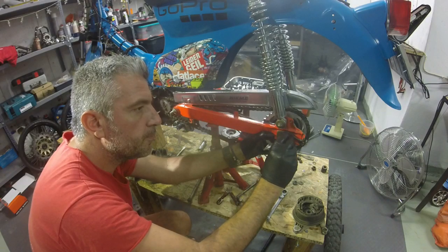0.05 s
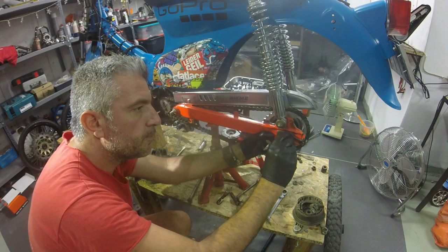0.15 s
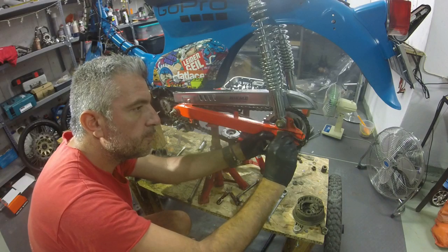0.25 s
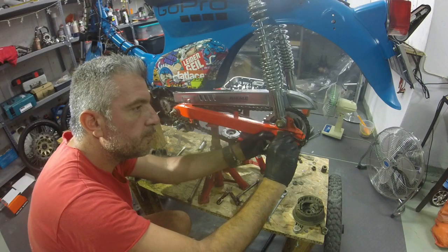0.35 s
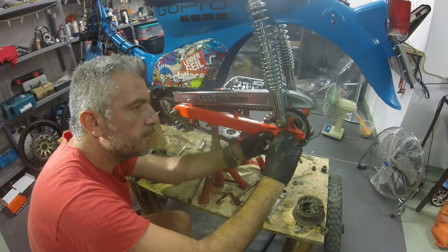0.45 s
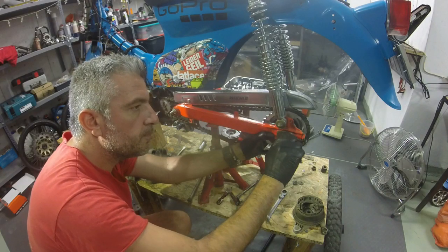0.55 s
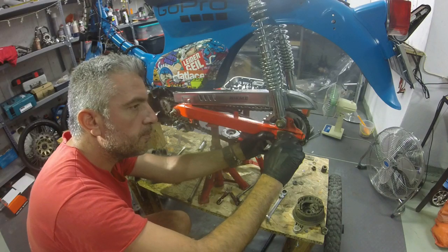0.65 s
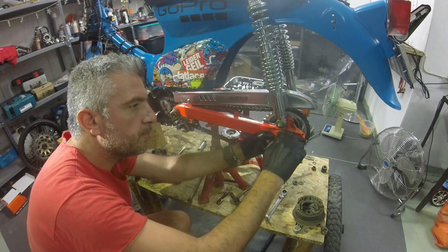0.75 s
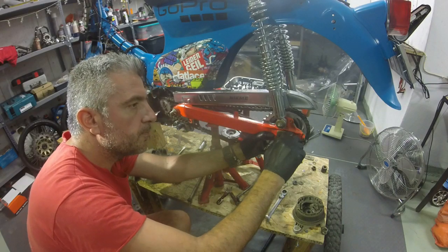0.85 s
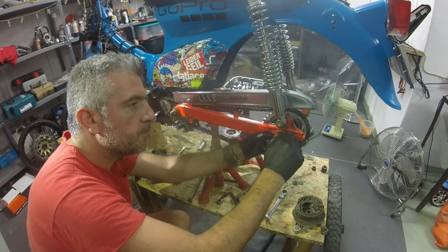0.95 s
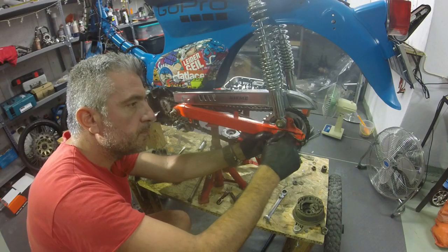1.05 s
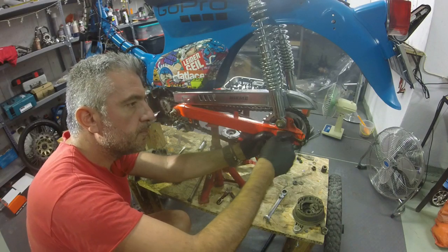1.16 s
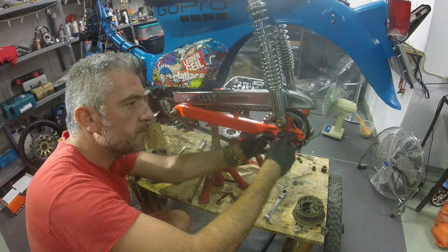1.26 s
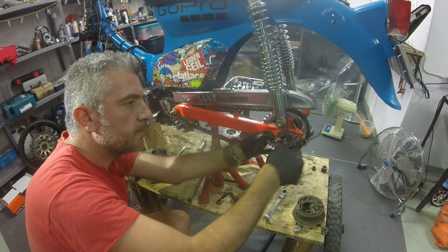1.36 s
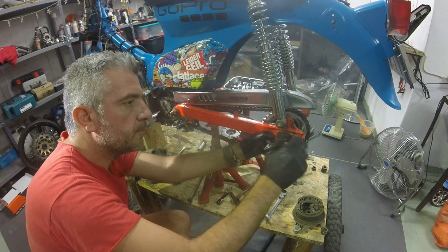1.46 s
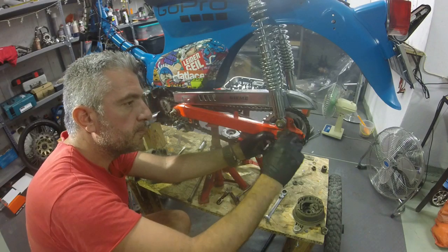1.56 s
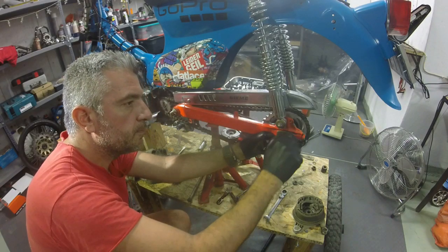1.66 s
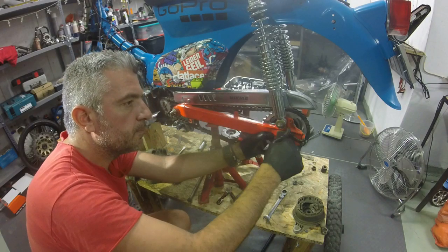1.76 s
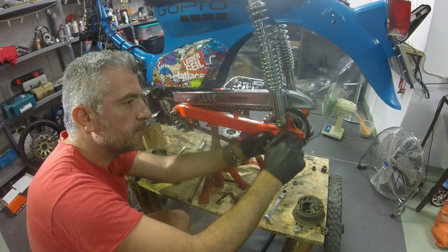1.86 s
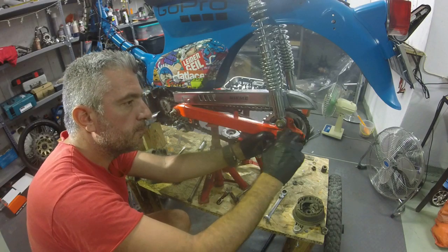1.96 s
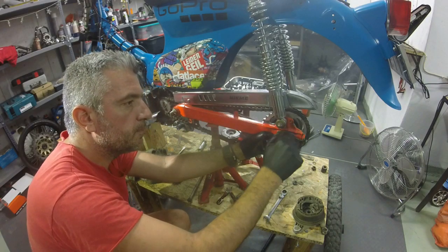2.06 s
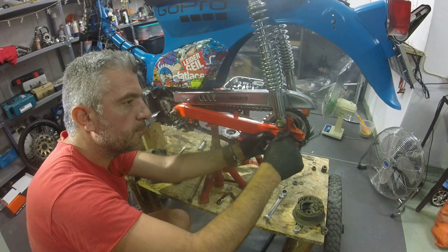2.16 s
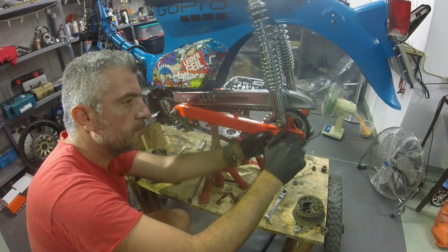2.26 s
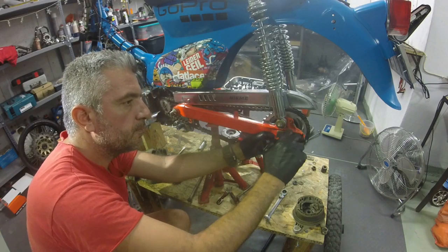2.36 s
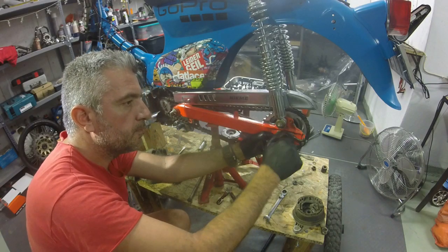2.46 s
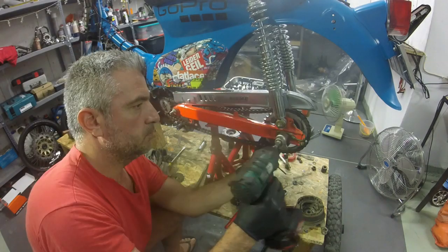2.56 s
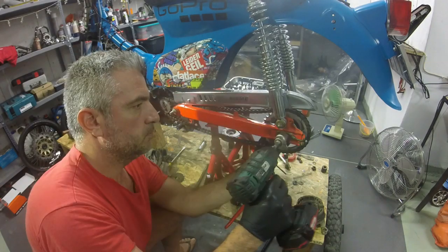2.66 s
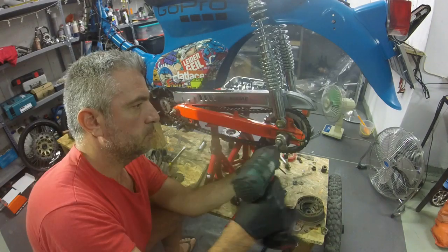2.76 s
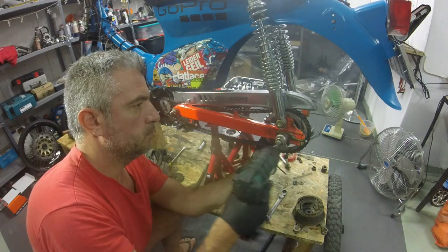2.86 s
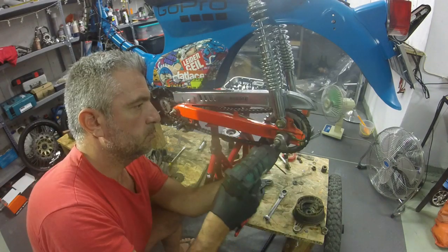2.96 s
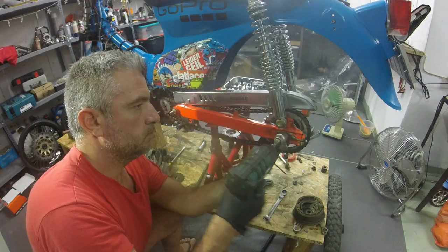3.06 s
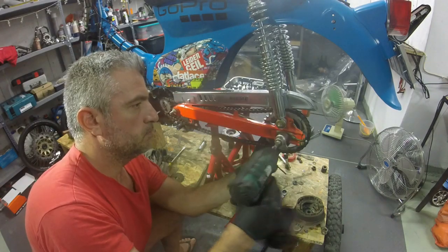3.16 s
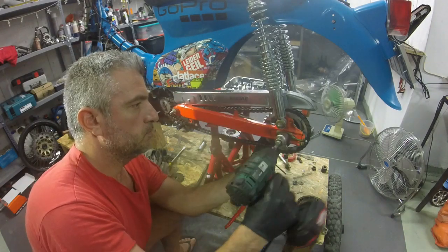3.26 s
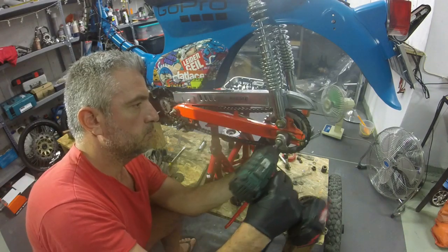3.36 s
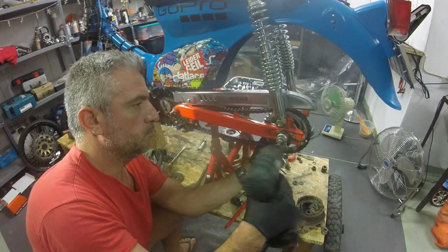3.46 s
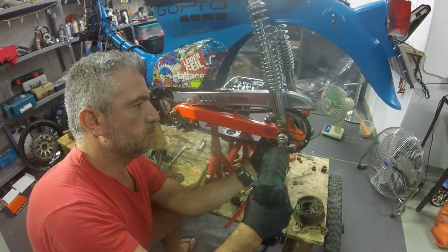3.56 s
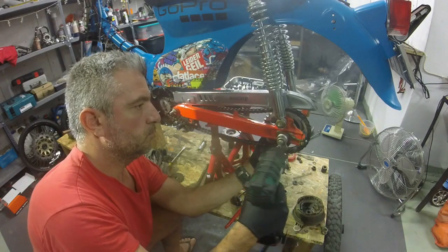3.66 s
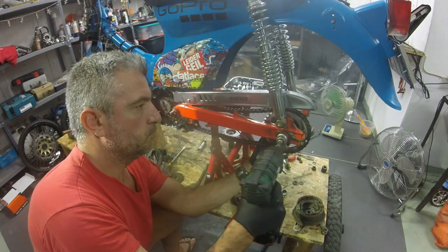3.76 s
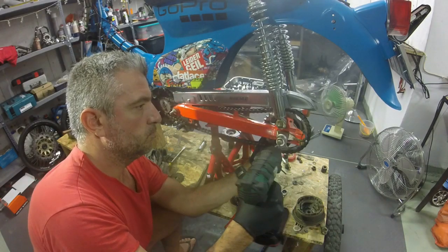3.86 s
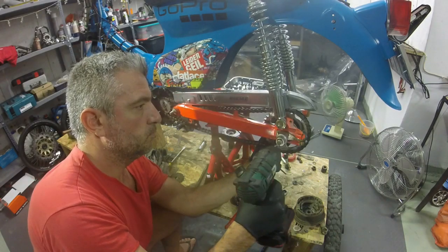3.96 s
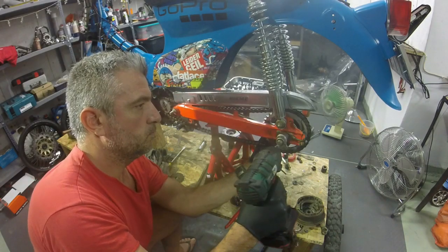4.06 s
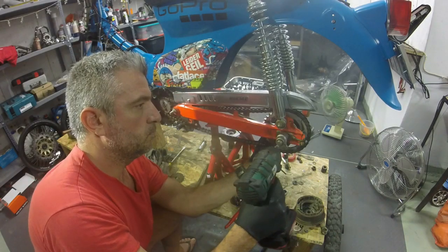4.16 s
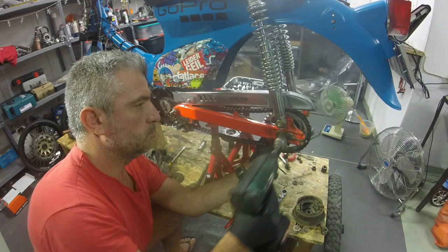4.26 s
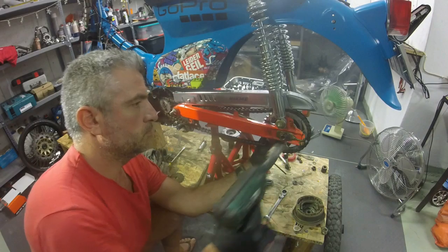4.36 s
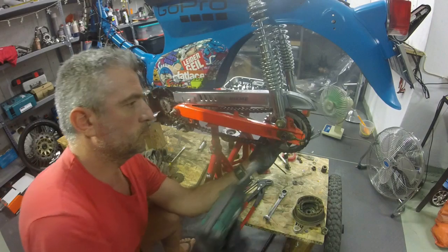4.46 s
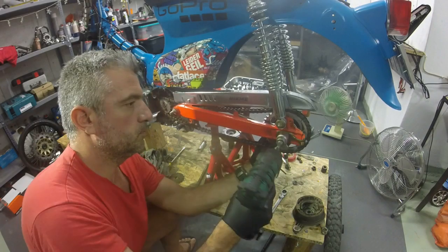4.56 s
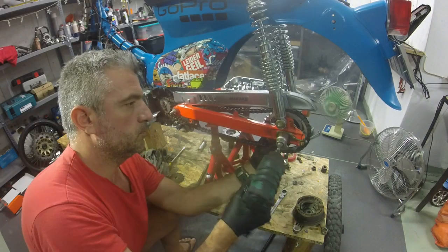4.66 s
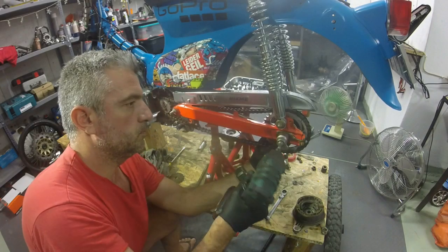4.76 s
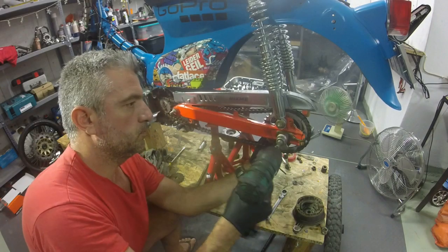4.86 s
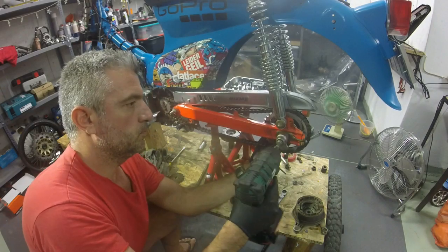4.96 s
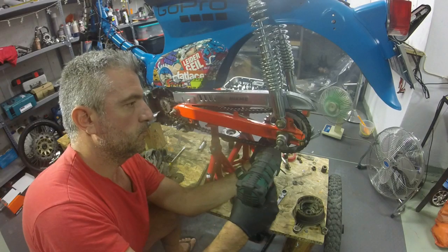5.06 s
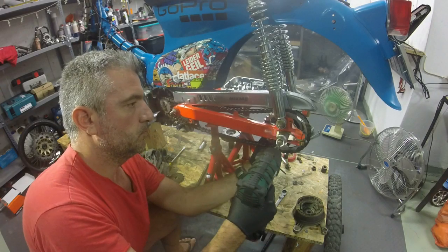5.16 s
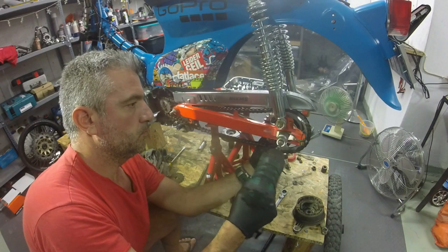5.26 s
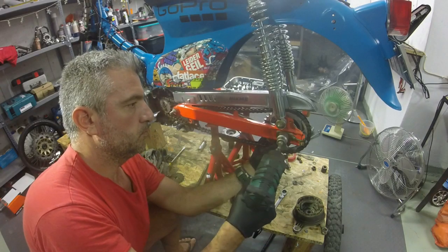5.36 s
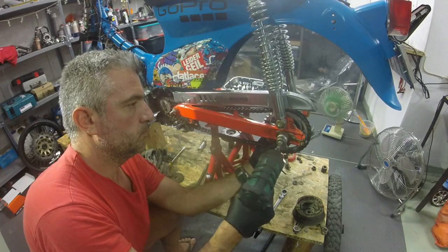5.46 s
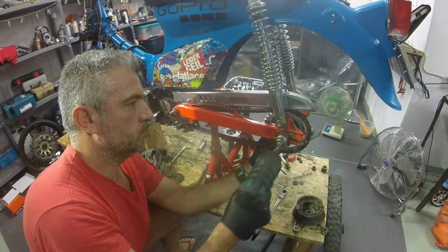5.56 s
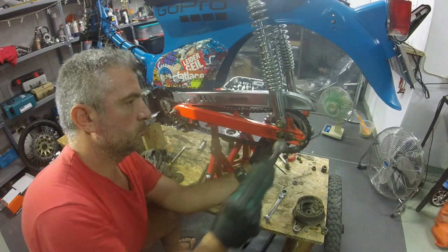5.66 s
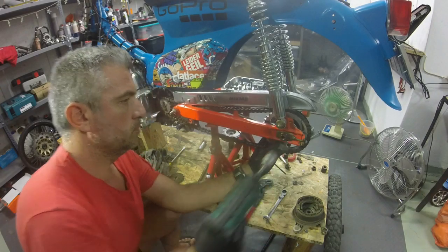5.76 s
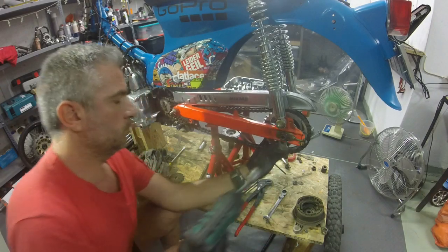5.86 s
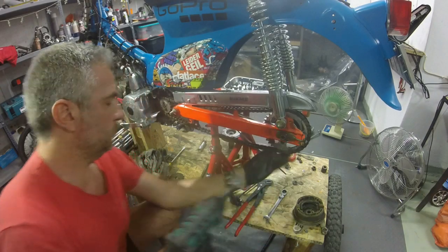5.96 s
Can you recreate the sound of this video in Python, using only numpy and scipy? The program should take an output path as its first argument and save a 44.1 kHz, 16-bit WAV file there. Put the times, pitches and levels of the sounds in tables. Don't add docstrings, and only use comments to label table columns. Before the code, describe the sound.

In a concrete-floored garage, fingers and spanner tick on a nut before an impact wrench hammers twice, rattling a steel frame over distant fan noise.

```python
import sys
import numpy as np
from scipy import signal
from scipy.fft import rfft, irfft
from scipy.io import wavfile
from scipy.ndimage import uniform_filter1d

SR = 44100
rng = np.random.default_rng(int(sys.argv[2]) if len(sys.argv) > 2 else 0)


def gain_from_decibels(decibels):
    exponent = np.asarray(decibels, float) / 20
    return 10 ** exponent


def to_wav(s):
    ch = np.atleast_2d(s).T
    pcm = np.round(np.clip(ch, -1, 1) * 32767)
    wavfile.write(sys.argv[1], SR, pcm.astype(np.int16))


N = 265482

# hz, level_db (per Hz)
RATTLE_SPECTRUM = [(59, -34.5), (100, -40), (570, -64), (648, 6), (801, 0), (1800, 5), (2990, 2), (3940, 5.5),
                   (12900, -10.5), (16000, -21)]


def rms_one(x):
    return x / np.sqrt(np.mean(x ** 2) + 1e-20)


def at_hz(points, hz):
    table_hz, value = np.transpose(points)
    return np.interp(np.log(np.maximum(hz, 1)), np.log(table_hz), value)


def in_time(points):
    s, db = np.transpose(points)
    return np.interp(np.arange(N) / SR, s, db, right=-200, left=-200)


def band(x, low_hz, high_hz):
    sos = signal.butter(2, [low_hz, min(high_hz, .45 * SR)], "band", fs=SR, output="sos")
    return signal.sosfilt(sos, x)


def coloured(spectrum):
    hz = np.fft.rfftfreq(N, 1 / SR)
    return rms_one(irfft(rfft(rng.standard_normal(N)) * gain_from_decibels(at_hz(spectrum, hz)), N))


def ring(drive, hz, t60_s):
    r, w = gain_from_decibels(-60 / (t60_s * SR)), 2 * np.pi * hz / SR
    return signal.lfilter([0, np.sin(w)], [1, -2 * r * np.cos(w), r * r], drive)


def resonance(x, hz, width_hz):
    r = np.exp(-np.pi * max(width_hz, hz / 8) / SR)
    poles = [1, -2 * r * np.cos(2 * np.pi * hz / SR), r * r]
    return signal.lfilter([(1 - r * r) / 2, 0, (r * r - 1) / 2], poles, x)


def contacts(rows, tone_db):
    s, peak_db, soft, bite, t60_s = np.transpose(rows)
    thud, body, edge = tone_db
    return np.transpose([s, peak_db, thud + soft, body + 0.75 * soft, edge + bite, t60_s])


def strike(events, peaks, lag_s, edge_pace, thud_hz):
    start_s, peak_db, thud_db, body_db, edge_db, t60_s = np.transpose(events)
    age = np.arange(SR // 3) / SR
    fall_db = -60 * age / t60_s[:, None]

    grains = rng.standard_normal(fall_db.shape) * gain_from_decibels(1.1 * rng.exponential(1, fall_db.shape))
    crack = 1 + gain_from_decibels(-0.5 - 60 * age / .009)
    chatter = grains * crack * (1 - np.exp(-age / 0.00021))
    late = 1 - np.exp(-age / lag_s)

    dying = chatter * gain_from_decibels(fall_db)
    bite = -band(band(dying, 2800, 5200), 1000, 10400)
    thud = -band(chatter * gain_from_decibels(fall_db / 2) * late, thud_hz, 1000)
    body = band(dying, 1000, 2800)
    edge = band(chatter * gain_from_decibels(fall_db * edge_pace), 5200, 11000)

    drive = np.full(N + SR, 1e-18)
    for burst, db in [(bite, 0), (thud, thud_db), (body, body_db), (edge, edge_db)]:
        loudest = np.sqrt(uniform_filter1d(burst ** 2, size=128, axis=1).max(axis=1))
        scaled = burst * (gain_from_decibels(peak_db + db - 6.0) / loudest)[:, None]
        for s, one in zip(start_s, scaled):
            k = round(s * SR)
            drive[k:k + len(age)] += one
    drive = drive[:N]
    return drive + sum(gain_from_decibels(lift_db) * resonance(drive, hz, wide) for hz, wide, lift_db in peaks)


def fans():
    # hz, level_db (per Hz)
    air_spectrum = [(12, -32), (20, -10), (53, 2), (81, -9), (293, -13.5), (422, -16.5), (590, -18),
                    (738, -19.5), (873, -21.5), (1290, -22.5), (2990, -29), (3740, -30.5), (5530, -34.5),
                    (13200, -50.5), (16000, -62)]
    # time_s, level_db
    draught = [(0, -67), (.65, -58.5), (2.9, -63), (3.34, -54), (4.1, -60.5), (4.4, -60.5), (6.02, -71.5)]
    air = coloured(air_spectrum)
    low = signal.sosfilt(signal.butter(4, 100, fs=SR, output="sos"), air)
    high = signal.sosfilt(signal.butter(4, 100, "high", fs=SR, output="sos"), air)
    return gain_from_decibels(-56.5) * rms_one(high) + gain_from_decibels(in_time(draught)) * rms_one(low)


def compressor_hum():
    hum_hz, width_hz, level_db, stop_s, fade_s = 54.6, 1.1, -61.5, 2.37, 0.11
    r = np.exp(-np.pi * width_hz / SR)
    poles = [1, -2 * r * np.cos(2 * np.pi * hum_hz / SR), r * r]
    tone = signal.lfilter([1], poles, rng.standard_normal(N + SR))[SR:]
    fade = np.clip((stop_s - np.arange(N) / SR) / fade_s + 1, 0, 1)
    return gain_from_decibels(level_db) * rms_one(tone) * fade


def old_echoes():
    # time_s, level_db
    tail = [(0, -57), (.15, -73)]
    return gain_from_decibels(in_time(tail)) * coloured(RATTLE_SPECTRUM)


def workshop(x):
    # hz, t60_s
    room_t60 = [(100, 0.24), (300, 0.87), (1000, 0.81), (2500, 0.78), (5000, 0.58), (7500, 0.67),
                (11000, 0.42), (16000, 0.49)]
    onset_s, tilt_db, side_count = 0.0041, -1.5, 5
    age = np.arange(SR) / SR
    edges_hz = 80 * 2 ** np.arange(0, 8.1, 1 / 3)
    white = rng.standard_normal((2, side_count, SR))
    echo = 0
    for k, (low, high) in enumerate(zip(edges_hz, edges_hz[1:])):
        fall_db = tilt_db * k / 3 - 60 * age / at_hz(room_t60, np.sqrt(low * high))
        echo = echo + band(white[k % 2], low, high) * gain_from_decibels(fall_db)
    echo = echo * (1 - np.exp(-(age / onset_s) ** 2))
    echo = echo / np.sqrt(np.sum(echo ** 2))
    grain = signal.lfilter([1], [1, -1.96, .98 ** 2], rng.standard_normal((side_count, N)))
    return signal.fftconvolve(x * rms_one(grain), echo, axes=1)[:, :N].sum(axis=0)


def scuffs():
    # start_s, length_s, centre_hz, width_hz, level_db
    rubs = [(1.368, 0.027, 5070, 2000, -63), (1.61, 0.2, 3900, 1500, -65),
            (2.021, 0.052, 6130, 6000, -63.5), (2.067, 0.043, 6300, 6000, -66),
            (2.417, 0.12, 4080, 700, -61), (4.55, 0.29, 2720, 3840, -56.5)]
    t = np.arange(N) / SR
    white = rng.standard_normal(N) * gain_from_decibels(2 * rng.exponential(1, N))
    out = np.zeros(N)
    for start, length, hz, wide, db in rubs:
        swell = np.sin(np.pi * np.clip((t - start) / length, 0, 1))
        out += gain_from_decibels(db) * swell * rms_one(band(white, hz - wide / 2, hz + wide / 2))
    return out


def rings():
    # hz, level_db, t60_s
    spanner = [(4230, -49, .2), (6900, -60, 0.18), (8970, -59, 0.32), (11970, -70, .25), (14400, -71, .2)]
    sleeve = [(12300, -60, .22), (12800, -62, .25), (13400, -63, .2), (14000, -65, .18)]
    bench = [(308, -39.5, 0.65)]
    stand = [(120, -38.5, 0.27), (188, -46.5, 0.57)]
    housing = [(1640, -49.5, .3), (2130, -48.5, .4), (2317, -46.5, .4), (2580, -49.5, .35)]
    link = [(682, -39.5, 0.15), (3660, -42.5, 0.1), (4660, -47, .1)]
    arm = [(364, -39, 0.6), (645, -30, 0.44), (900, -33, 0.32), (900, -68, .43)]
    # start_s, level_db
    spanner_knocks = [(2.288, 0)]
    sleeve_knocks = [(4.669, 0), (4.684, -1)]
    bench_knocks = [(2.842, -17), (3.24, -1.5), (3.45, -15.5), (4.041, 1), (4.558, -15.5), (4.688, -10.5),
                    (5.241, -5.5), (5.35, 6)]
    stand_knocks = [(3.24, -3), (3.451, -6), (3.899, 1), (4.559, -10.5), (4.689, -7.5), (5.242, 6)]
    housing_knocks = [(3.237, 0), (3.25, -2), (3.447, -8.5), (4.03, 12), (4.554, -3.5), (5.355, 2)]
    link_knocks = [(.897, 3.5), (4.67, 8.5), (4.684, 8), (4.754, -5)]
    arm_knocks = [(3.9, -5), (3.95, 5.5), (5.3, -14.5)]
    # start_s, hz, level_db, t60_s
    linger = [(4.03, 852, -54, 3.0), (5.3, 545, -51, 5.6)]
    parts = [(spanner, spanner_knocks), (sleeve, sleeve_knocks), (bench, bench_knocks),
             (stand, stand_knocks), (housing, housing_knocks), (link, link_knocks), (arm, arm_knocks)]
    started = list(linger)
    for modes, knocks in parts:
        started += [(s, hz, db + knock_db, t60) for hz, db, t60 in modes for s, knock_db in knocks]

    out = np.zeros(N)
    knots = np.arange(0, N + 160, 160)
    for s, hz, db, t60 in started:
        k = round(s * SR)
        click = np.full(N - k, 1e-18)
        click[0] = gain_from_decibels(db)
        cluster = ring(click, hz, t60)
        cluster += .6 * ring(click, hz * 1.011, min(t60, 1) * .5)
        cluster -= .5 * ring(click, hz * .983, min(t60, 1) * .4)
        flutter = np.interp(np.arange(k, N), knots, rng.standard_normal(len(knots)))
        out[k:] += cluster * gain_from_decibels(7.0 * flutter * min((hz / 4000) ** 2, 1))
    return out


def fingers_and_spanner():
    # start_s, peak_db (2.8-5.2 kHz), softness_db, bite_db, chatter_t60_s
    ticks = [(0.8964, -25, -9.5, 3.5, 0.022), (0.9002, -32.5, 1.5, 2, 0.057), (1.1243, -59, 13.5, -6, .03),
             (1.269, -64, 14, -8, 0.096), (1.955, -51, 3, -2, 0.043), (2.2892, -29, -10, -15, .047),
             (2.3044, -45, 1, -10, 0.086), (2.3294, -51, 11.5, -6, 0.047), (2.3544, -53, 11, -6, 0.038),
             (2.4144, -63, 18.5, -8, 0.032), (2.591, -62, 12, 9, 0.016)]
    # hz, width_hz, lift_db
    nut = [(684, 300, -0.5), (1490, 350, -9.5), (3840, 320, 4), (4360, 410, -13)]
    return strike(contacts(ticks, (-5.5, 0.5, -5.5)), nut, lag_s=0.0019, edge_pace=1.7, thud_hz=390)


def wrench_lifted():
    # start_s, peak_db (2.8-5.2 kHz), softness_db, bite_db, chatter_t60_s
    clacks = [(2.7592, -50.5, 1, 18, .05), (2.8362, -43.5, 1.5, 1, 0.091), (2.8724, -50, -13, 2, 0.045),
              (3.0779, -54, -1, -4, .05), (3.1139, -46.5, -5, 8, 0.043), (3.1313, -44.5, -4.5, -13, 0.11),
              (3.2254, -37, 3, 5.5, .14), (3.2345, -27, 2, -2, .08), (3.2494, -40.5, 6.5, -16, 0.18),
              (3.3837, -55.5, -2.5, -4, .055), (3.4443, -40, 7, 5, 0.043), (3.4694, -51.5, 9.5, 3.5, 0.18),
              (3.5039, -43.5, 4, -1, .025), (3.5192, -55, 14.5, -2, 0.049), (3.6451, -53, 6.5, 0.5, 0.06),
              (3.6594, -61, -6.5, -4, 0.064)]
    # hz, width_hz, lift_db
    tool = [(650, 76, -2), (890, 150, -3.5), (1740, 500, -3.5), (2150, 530, 1.5)]
    return strike(contacts(clacks, (-2.5, -11, -22.5)), tool, lag_s=0.0016, edge_pace=1.7, thud_hz=235)


def socket_seating():
    # start_s, peak_db (2.8-5.2 kHz), softness_db, bite_db, chatter_t60_s
    seating = [(4.5521, -43.5, 4, -15, .12), (4.5694, -47.5, 4, -4.5, .12), (4.5894, -49, 4.5, -5, 0.32),
               (4.6688, -23.5, -1.5, 0, 0.024), (4.6734, -22, -6, 1.5, 0.037), (4.6829, -26, -2, -5, 0.11),
               (4.7294, -43.5, 15, -5, .04), (4.7531, -32.5, 5.5, -8, 0.023),
               (4.7644, -39.5, 9, -7.5, 0.07), (4.8519, -50, -4, -5.5, .03), (5.0644, -55, -5.5, 1, 0.055),
               (5.0883, -62.5, -4, 3, 0.038), (5.1064, -62, 1, -3, 0.059)]
    # hz, width_hz, lift_db
    socket = [(700, 910, -14), (2240, 570, -0.5), (3420, 380, -3), (4080, 250, -8.5), (13000, 1700, 6)]
    return strike(contacts(seating, (-3.5, -4.9, -19.5)), socket, lag_s=0.0067, edge_pace=1.6, thud_hz=520)


def rattle():
    # start_s, full_level_s, let_go_s, level_db
    pulls = [
        (3.835, 3.911, 4.03, -26.5),
        (5.191, 5.26, 5.36, -26),
    ]
    t = np.arange(N) / SR
    level = np.zeros(N)
    for start, full, let_go, db in pulls:
        swell_db = -30.5 * np.clip((full - t) / (full - start), 0, 1) ** 2
        die_away_db = -290 * np.maximum(t - let_go, 0)
        level += (t > start) * gain_from_decibels(db + swell_db + die_away_db)
    return coloured(RATTLE_SPECTRUM) * level


def hammer():
    # start_s, peak_db
    blows = [(3.926, -10), (3.9505, -11.5), (3.9749, -10), (3.9972, -9.5), (4.0211, -11.5), (5.2659, -6),
             (5.2961, -9.5), (5.3237, -8), (5.3519, -12)]
    t60_s, rebound_s = 0.037, .0042
    rows = []
    for s, db in blows:
        rows.append((s, db, 0, 0, t60_s))
        rows.append((s + rebound_s, db - 7, 7, -3, 1.6 * t60_s))
    return rows


def impact_wrench():
    # start_s, peak_db (2.8-5.2 kHz), softness_db, bite_db, chatter_t60_s
    clicks = [(3.8428, -34, -2, -8, 0.077), (3.8517, -28, 6.5, -8.5, 0.058), (3.8594, -29, 3, -4, 0.043),
              (3.8774, -19, -4, -11, 0.099), (3.8864, -15, 8.5, -8, 0.078), (3.8911, -4.5, -5, 1.5, 0.045),
              (3.898, -8, -8, 3, 0.066), (3.9044, -8, -0.5, -4, 0.058), (5.1985, -41.5, -5.5, 6, .03),
              (5.2035, -28, -2, -9.5, 0.053), (5.23, -17.5, 6, 6.5, 0.083), (5.2366, -21, 5, -0.5, 0.21),
              (5.259, -16.5, 1.5, 3, 0.094)]
    # hz, width_hz, lift_db
    frame = [(327, 34, -3), (619, 40, 3), (987, 220, -9), (1780, 320, 0), (2270, 230, -8.5),
             (3520, 230, -11), (4000, 233, -11.5), (14000, 2500, 1.5)]
    blows = np.vstack([contacts(clicks, (-11.5, -4.5, -7)), contacts(hammer(), (-15.5, -6.5, -3))])
    return strike(blows, frame, lag_s=0.0042, edge_pace=1.7, thud_hz=258) + rattle()


def scene():
    ticks, clacks = fingers_and_spanner(), wrench_lifted()
    seating, wrench = socket_seating(), impact_wrench()
    echoes = workshop(gain_from_decibels(-10.5) * ticks + gain_from_decibels(-11.5) * clacks + gain_from_decibels(-13.5) * seating + gain_from_decibels(-12.5) * wrench)
    near = ticks + clacks + seating + wrench + rings() + scuffs()
    return (near + echoes + old_echoes() + fans() + compressor_hum())[None]


def gain_control(x):
    duck_from_db, duck_share, recover_db_per_s = -35, 0.18, 9
    ramp = recover_db_per_s * np.arange(N) / SR
    level_db = 10 * np.log10(uniform_filter1d(x[0] ** 2, size=1024) + 1e-12)
    over = duck_share * np.maximum(level_db - duck_from_db, 0)
    duck_db = np.maximum.accumulate(over + ramp) - ramp
    return x * gain_from_decibels(-uniform_filter1d(duck_db, size=512))


def low_pass(x):
    return signal.sosfilt(signal.butter(12, 16450, fs=SR, output="sos"), x)


def record(dry):
    limited = 0.69 * np.tanh(1.198 * gain_control(dry) / 0.82)
    top_cut = signal.cheby2(14, 60, 16250, fs=SR, output="sos")
    return low_pass(signal.sosfilt(top_cut, limited))


dry = scene()
out = record(dry)
to_wav(out)
```